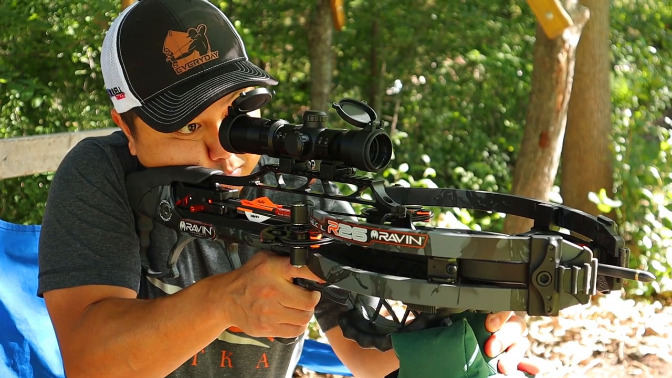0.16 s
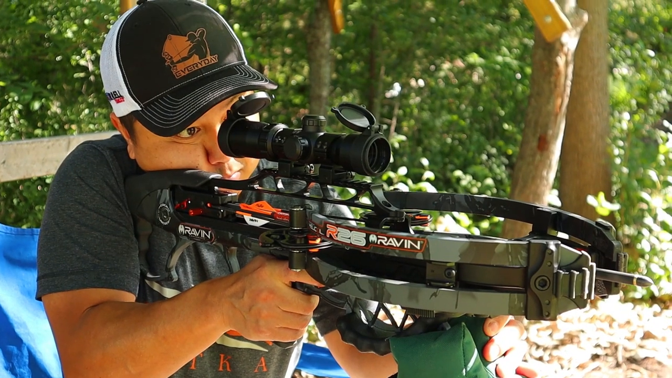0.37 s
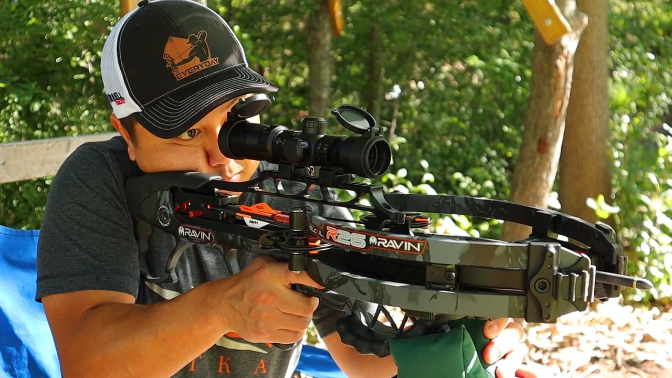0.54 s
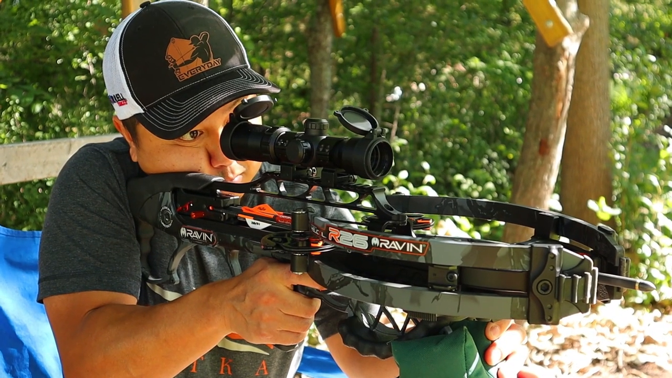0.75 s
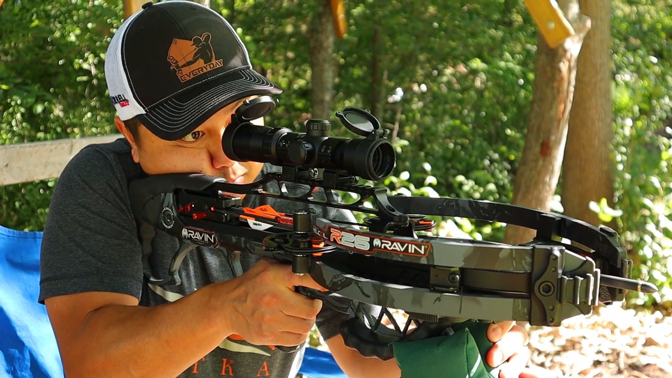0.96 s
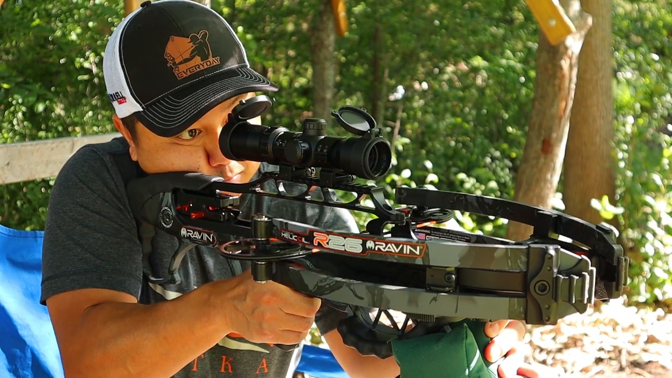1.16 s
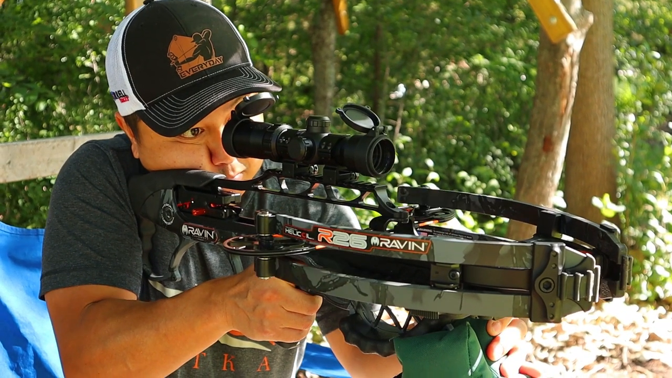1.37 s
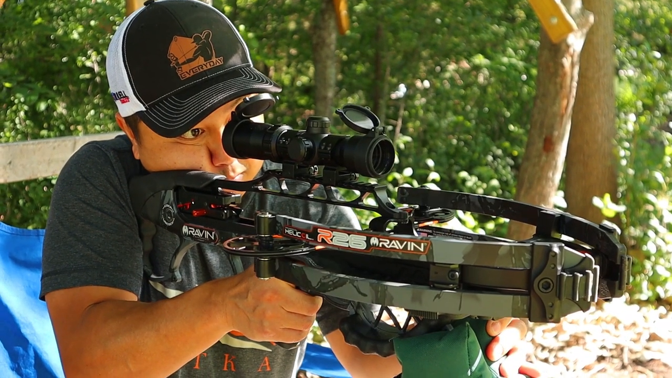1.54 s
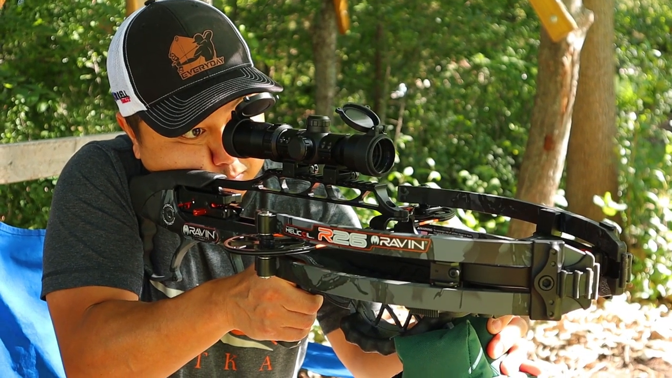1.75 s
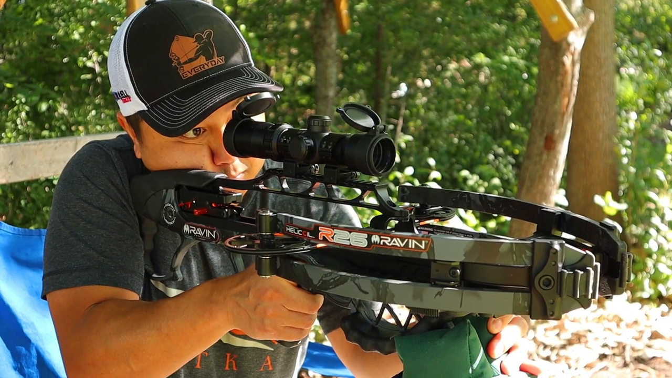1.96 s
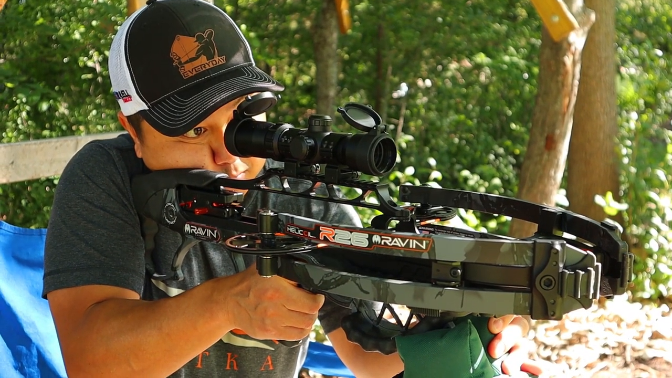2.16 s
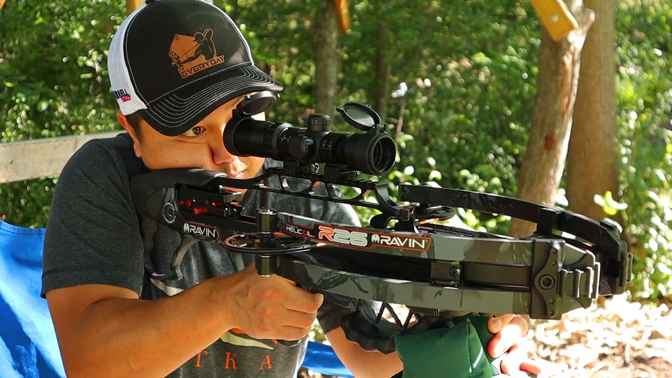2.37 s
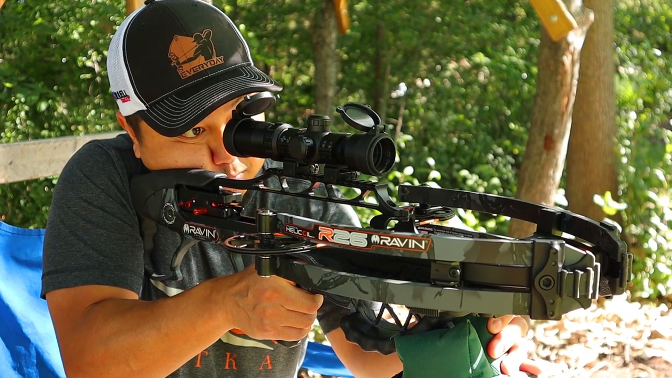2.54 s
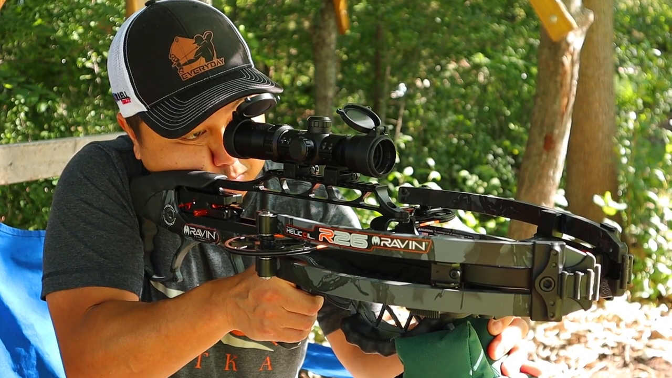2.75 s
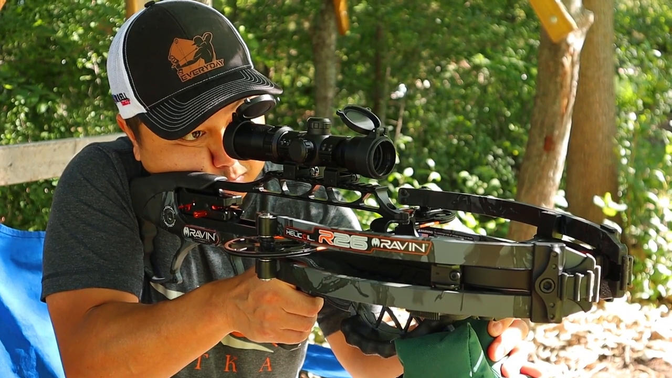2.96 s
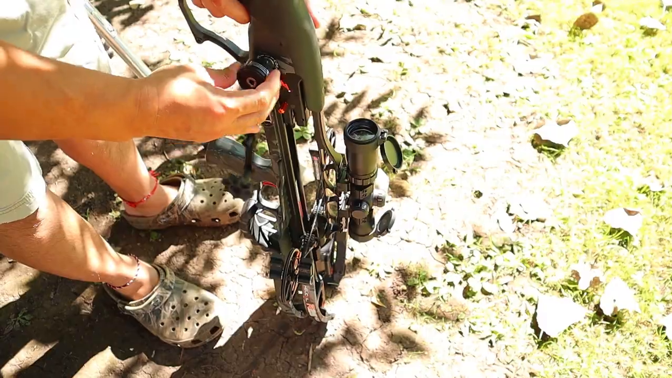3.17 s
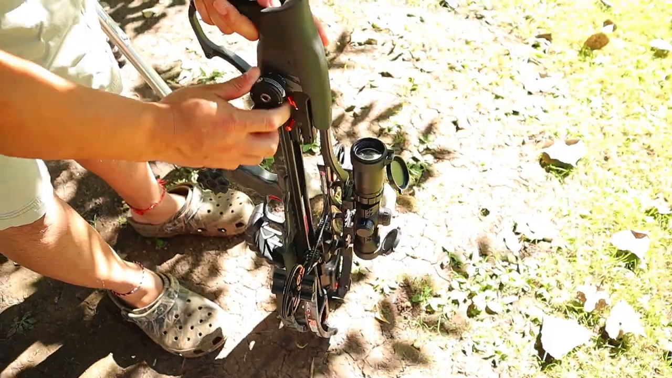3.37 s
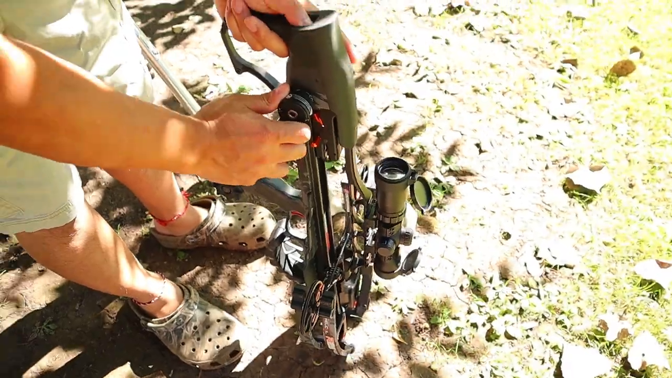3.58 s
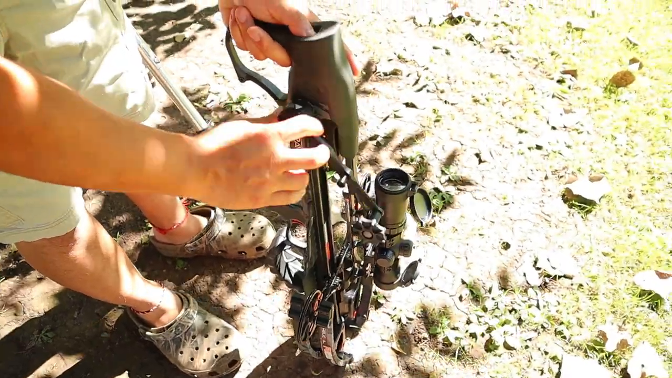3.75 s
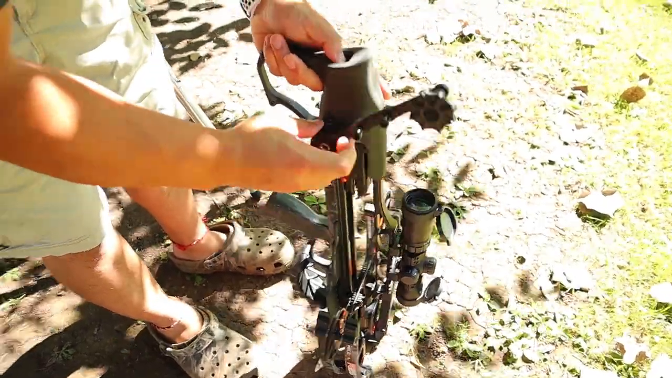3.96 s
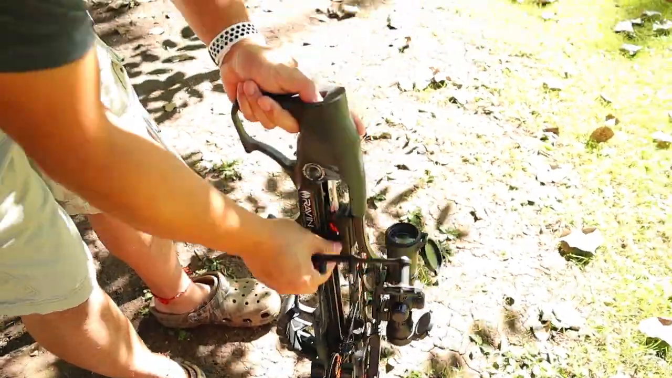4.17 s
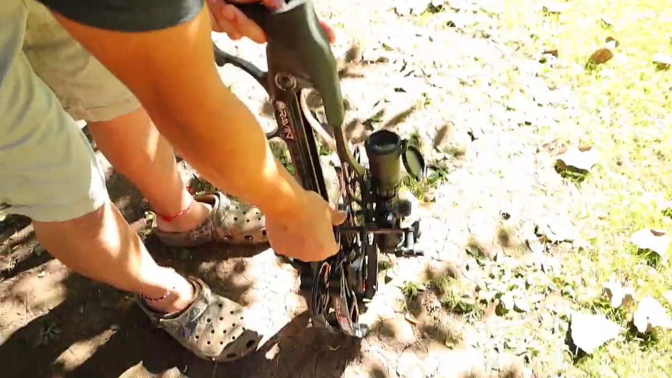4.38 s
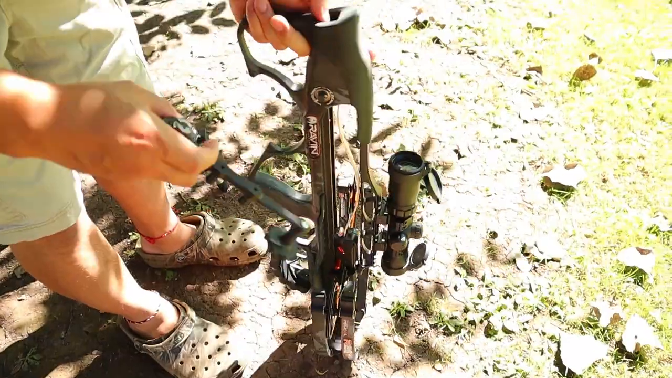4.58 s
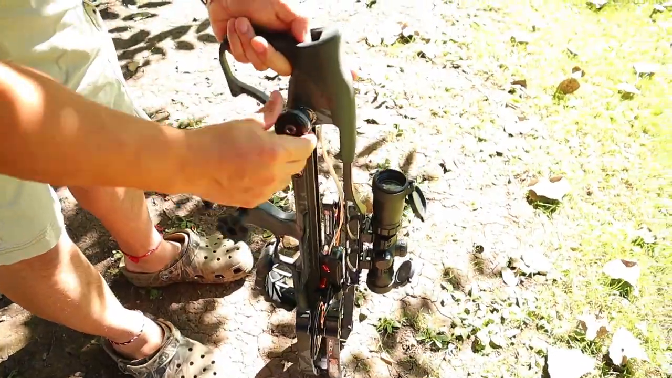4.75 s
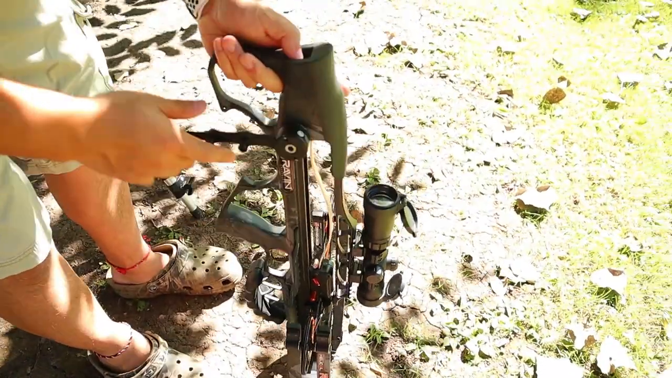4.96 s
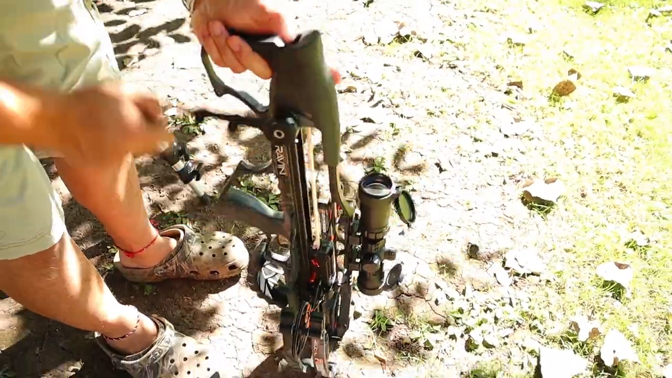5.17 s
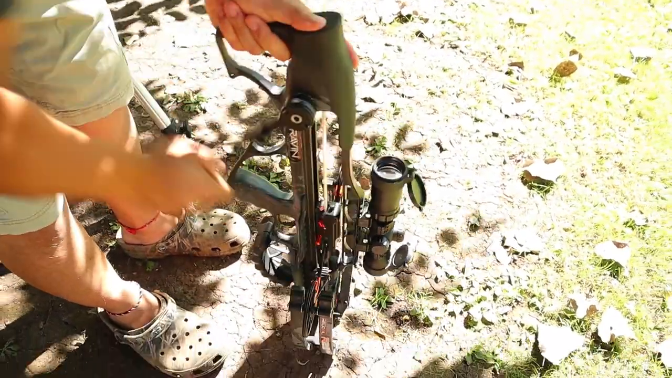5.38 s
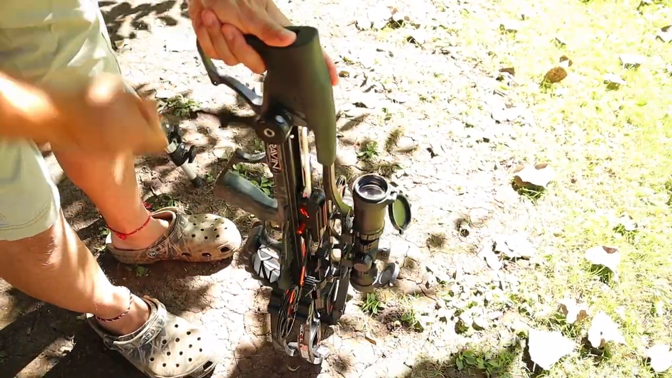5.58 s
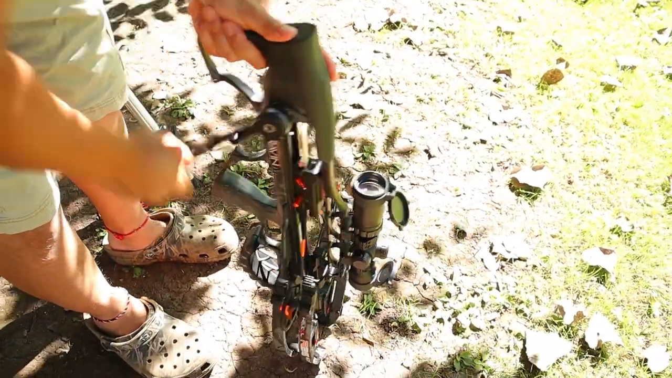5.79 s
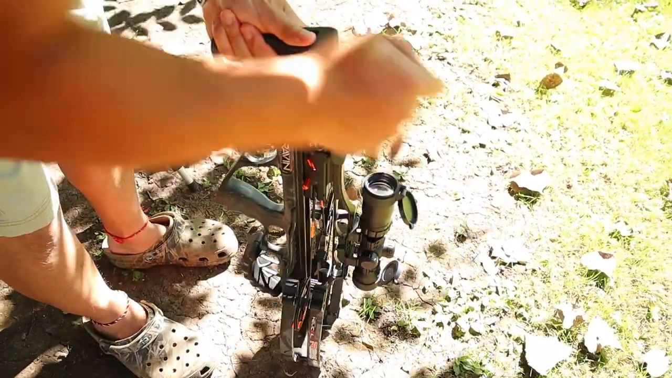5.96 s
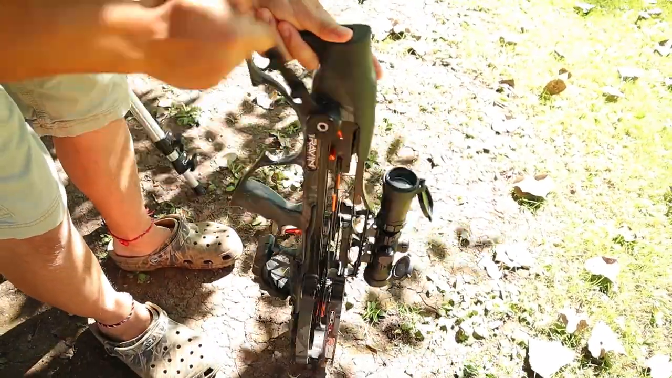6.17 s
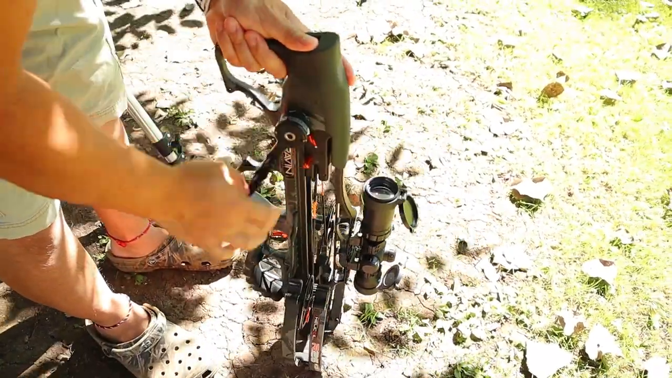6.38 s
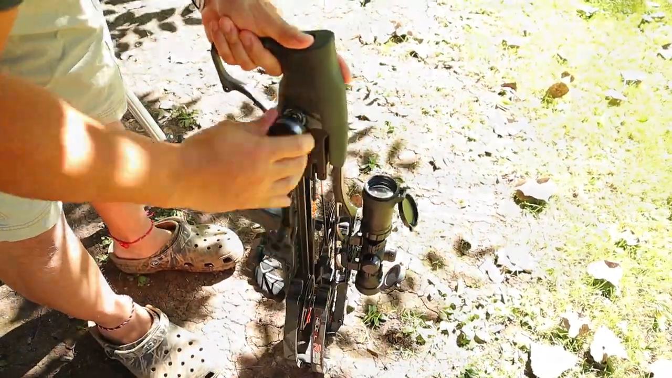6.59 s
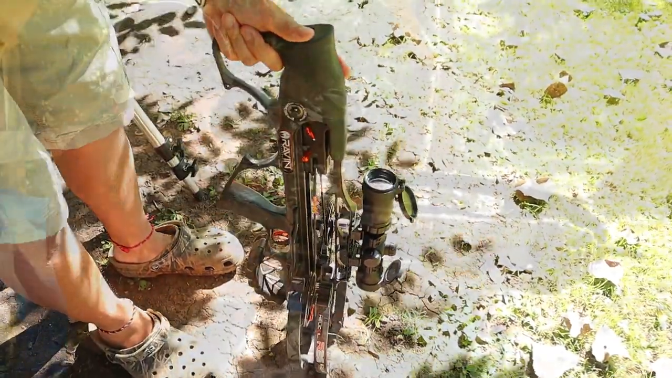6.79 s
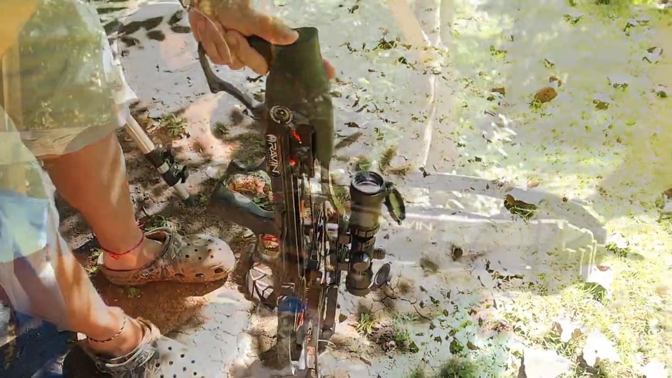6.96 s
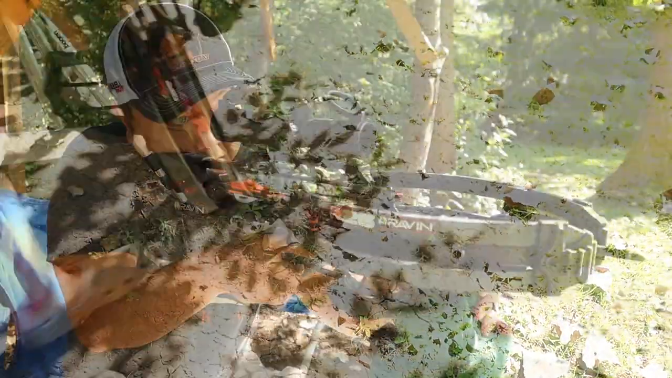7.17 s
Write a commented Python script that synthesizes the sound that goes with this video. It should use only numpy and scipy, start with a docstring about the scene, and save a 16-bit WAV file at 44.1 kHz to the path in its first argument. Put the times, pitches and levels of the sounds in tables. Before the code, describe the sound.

Outdoors, soft woodland noise and an approaching vehicle precede a loud, sharp crossbow snap with a brief limb ring. A fifth of a second later the bolt cracks into a target, and echoes fade through the trees under passing tyres. The place then cuts to a yard with faint hum and hiss, where a crank handle clicks, scrapes and knocks, then spins a bright fast ratchet. Close microphone.

```python
"""A crossbow fires among trees near a road: noise bursts for the string, decaying sines for the limbs,
a pressure swing and crack on the target, tilted noise tails for the echoes. The scene changes to the ground
near a humming machine: a crank handle is fitted with clicks, scrapes and knocks, then spun, and two pawls
rattle over a sixteen-tooth ratchet wheel that binds once a turn: short blows through steel, handle and
stock resonances. Late on, two whistles of a far bird."""
import sys
import numpy as np
from scipy import signal
from scipy.fft import rfft, irfft, next_fast_len
from scipy.io import wavfile
from scipy.ndimage import uniform_filter1d, map_coordinates

SR = 44100
rng = np.random.default_rng(int(sys.argv[2]) if len(sys.argv) > 2 else 0)


def ratio(d):
    """dB to gain"""
    e = np.asarray(d, float) / 20
    return 10 ** e


def store_pcm(level_fs):
    """Save levels as 16-bit WAV."""
    pcm = np.round(np.clip(level_fs, -1, 1) * 32767).astype(np.int16)
    wavfile.write(sys.argv[1], SR, np.atleast_2d(pcm).T)


N = 318843
T = np.arange(N) / SR
CUT_S = 3.193  # trees before, ground after

# colour of bolt crack and echoes: freq_hz, density_db_per_hz (relative)
WOODS = [(90, -42.5), (200, -2), (500, 2.5), (1000, 5), (1900, 1), (3000, 4.5), (4500, -2), (8000, -19.5),
         (12000, -26), (16000, -40.5)]
# steel ring: freq_hz, width_hz, first_pawl_db, second_pawl_db
STEEL = [(5090, 1230, -14.5, -21.5), (6730, 830, -3.5, -1.5), (8510, 680, 1.5, 2), (9350, 810, 0.5, -2.5),
         (11600, 1100, -9, -8), (14500, 2000, -13.5, -9)]
# stock resonances: freq_hz, width_hz, level_db
STOCK = [(1488, 570, -12.5), (1915, 430, -5), (2700, 250, 0.5), (3255, 390, 2), (4330, 740, 2)]


def unit(x):
    """Scale to rms 1."""
    return x / np.sqrt(np.mean(x ** 2) + 1e-20)


def along(points, hz):
    """Read (Hz, value) points on a log frequency axis."""
    f, v = np.transpose(points)
    return np.interp(np.log(hz + 1), np.log(f + 1), v)


def curves(rows):
    """A gate for the span of the rows, then one value per sample for each column."""
    s, *cols = np.transpose(rows)
    gate = np.interp(T, [s[0] - .002, s[0], s[-1], s[-1] + 0.0037], [0, 1, 1, 0])
    return [gate] + [np.interp(T, s, c) for c in cols]


def wobble(rate):
    """A smooth random curve, rate knots a second."""
    knots = rng.standard_normal(int(N * rate / SR) + 4)
    return map_coordinates(knots, [T * rate])


def filtered(x, response):
    """x times a complex response of frequency."""
    m = next_fast_len(N + 8192)
    return irfft(rfft(x, m) * response(np.fft.rfftfreq(m, 1 / SR)), m)[..., :N]


def noise(spectrum):
    """Coloured noise of rms 1."""
    return unit(filtered(rng.standard_normal(N), lambda hz: ratio(along(spectrum, hz))))


def ringing(hz, centre, width):
    """One causal resonance, unit gain at its centre."""
    return 1j * hz * width / (centre ** 2 - hz ** 2 + 1j * hz * width)


def body(x, modes):
    """x through (Hz, width Hz, dB) resonances of alternating sign, unit gain for noise."""
    def response(hz):
        ring = sum((-1) ** k * ratio(db) * ringing(hz, c, w) for k, (c, w, db) in enumerate(modes))
        return unit(np.abs(ring)) * np.exp(1j * np.angle(ring))
    return filtered(x, response)


def fading(s, t60_s, rise_s):
    """An envelope that rises at s and dies away exponentially."""
    t = np.maximum(T - s, 0)
    return ratio(-60 * t / t60_s) * (1 - np.exp(-t / rise_s))


def strikes(times_s, energy_db, t60_s, spike, bend, rebound_s):
    """Excitation of many contacts: a sharp blow, its rebound and a dying rattle, each new."""
    t = np.arange(1024) / SR
    chance = rng.standard_normal((len(times_s), len(t)))
    rows = ratio(-60 * (t / np.reshape(t60_s, (-1, 1))) ** bend) * chance  # bend over 1 holds, then drops
    rows = rows * (1 + 1.5 * np.exp(-((t - rebound_s) / 0.00014) ** 2)) + spike * (t == 0)
    rows = rows * ratio(energy_db)[:, None] / np.linalg.norm(rows, axis=1, keepdims=True)
    at = np.round(np.asarray(times_s) * SR).astype(int)[:, None] + np.arange(len(t))
    return np.bincount(at.ravel(), rows.ravel(), N + len(t))[:N]


def road():
    """A vehicle nears and passes: tyre hiss, a narrow-band engine drone, and rumble that follows it."""
    # time_s, tyre_hiss_db, engine_db, engine_drone_hz
    passing = [(0, -52, -63, 199.8), (1.1, -50.5, -65, 228.3), (1.5, -51.5, -58.5, 283.7),
               (1.95, -43.5, -48, 273.5), (2.55, -43, -41.5, 240.3), (2.85, -43, -44.5, 243),
               (3.19, -44, -39, 223.6)]
    # freq_hz, density_db_per_hz (relative)
    tyre_colour = [(210, -13), (350, -3.5), (459, -4.5), (579, -6.5), (1080, 1), (1290, 0), (2690, -12),
                   (3380, -15.5), (4880, -28.5), (9000, -55.5), (11700, -79), (19800, -120)]
    rumble_colour = [(25, -26.5), (60, -1.0), (110, 1), (180, -3.5), (350, -26.0), (700, -60)]
    _, hiss_db, drone_db, drone_hz = curves(passing)
    rumble_db = -49.5 + .55 * (drone_db + 43)  # swings .55 dB per engine dB
    phase = 2 * np.pi * np.cumsum(drone_hz) / SR
    drone = (wobble(120) + 1j * wobble(120)) * np.exp(1j * phase)  # a narrow band of noise
    tyres = ratio(hiss_db + 0.48 * wobble(6)) * noise(tyre_colour)
    engine = ratio(drone_db + 1.9 * wobble(8)) * unit(drone.real)
    return tyres + engine + ratio(rumble_db + 1.8 * wobble(8.1)) * noise(rumble_colour)


def trees():
    """Steady coloured noise of the woods."""
    # freq_hz, density_db_per_hz (relative)
    colour = [(12, -34.5), (20, -11), (134, -2), (270, -11), (357, -26.5), (485, -14), (1290, -8.5),
              (2990, -18), (4300, -26.5), (12100, -42), (16000, -46.5)]
    return ratio(-48) * noise(colour)


def shot():
    """String release, stop and rebound as noise bursts; the limbs and rail as decaying sines."""
    # release, stop, rebound: start_s, level_db, t60_s
    snap = [(1.1577, 3, 0.056), (1.1641, 7.5, 0.028), (1.171, -1, 0.09)]
    # freq_hz, density_db_per_hz (relative)
    string_colour = [(71, -47.5), (120, -23.5), (378, -7.5), (1830, -6), (2110, -4.5), (2480, 0.5),
                     (5300, -14.5), (7050, -18.5), (7660, -23), (10400, -19.5), (16000, -28)]
    # limb and rail modes: freq_hz, level_db, t60_s
    limbs = [(140, -18, 0.081), (432, -4, 0.18), (446, -11.5, 0.3), (697, -7.5, 0.12), (973, -6, 0.05),
             (1245, -2.5, 0.054), (1400, -15.5, 0.068), (1980, -10.5, .07), (2478, 2, 0.034),
             (2560, -7.5, 0.067), (3250, -4, 0.069), (4030, -7, 0.037)]
    flutter_db, build_cycles = 2.5, 1.5  # unsteady ring; swings a mode takes to build up
    out = sum(ratio(db) * fading(s, t60, 0.0002) for s, db, t60 in snap) * noise(string_colour)
    start = snap[0][0]
    for hz, db, t60 in limbs:
        level = ratio(db + flutter_db * wobble(45)) * fading(start, t60, build_cycles / hz)
        out = out + level * np.sin(2 * np.pi * hz * (T - start))
    return out


def echoes():
    """Trunks scatter each bang back; farther trunks return it later, weaker and duller."""
    # after the string, after the bolt: start_s, level_db, first_tilt_db_per_octave
    bangs = [(1.18, -21.5, 3), (1.372, -24, 1.5)]
    near_t60_s, far_t60_s, far_db, build_s = .45, 1.8, -19, .004  # far_db: relative to near trunks
    dulling, dullest = 12, -9.5  # tilt lost, dB per octave a second; lowest tilt, dB per octave
    out = 0
    for s, db, tilt in bangs:
        hz, t, z = signal.stft(noise(WOODS), SR, nperseg=256)
        octaves = np.log2(np.maximum(hz, 150) / 2800)[:, None]
        tilt_now = np.clip(tilt - dulling * (t - s), dullest, tilt)
        tail = signal.istft(z * ratio(octaves * tilt_now), SR, nperseg=256)[1][:N]
        dying = fading(s, near_t60_s, build_s) + ratio(far_db) * fading(s, far_t60_s, build_s)
        out = out + ratio(db + 0.89 * wobble(70)) * dying * tail
    return out * (T < CUT_S)


def target():
    """Bolt strike and its slap off a wall: a pressure swing, a short crack, the block's dull ring."""
    # strike, slap: start_s, level_db, swing_hz, crack_db (relative to the swing)
    hits = [(1.3692, -12.5, 1496, 3.5), (1.3906, -6.5, 795, -7.5)]
    block_db, block_hz, block_t60_s = -24.5, 410, 0.063
    out = 0
    for s, db, hz, crack_db in hits:
        u = (T - s) * hz  # cycles since the hit
        swing = np.sin(2 * np.pi * u) * np.exp(-(np.maximum(u - .6, 0) / 0.3) ** 2) * (u > 0)
        crack = ratio(crack_db) * fading(s, 0.013, .0001) * noise(WOODS)
        ring = fading(s, block_t60_s, 0.0022) * np.sin(2 * np.pi * block_hz * (T - s) + wobble(60))
        out = out + ratio(db) * (swing + crack) + ratio(block_db) * ring
    return out


def yard():
    """Yard hiss and low wind noise on the microphone, each of wavering level."""
    # time_s, wind_db, hiss_db
    air = [(3.2, -59, -54.5), (3.8, -62.5, -55.5), (4.1, -51.5, -53), (4.5, -50, -55), (5.4, -66, -53.5),
           (6.75, -66.5, -56), (7.0, -58.5, -51), (7.23, -53, -54.5)]
    # freq_hz, density_db_per_hz (relative)
    hiss_colour = [(12, -34), (20, -9), (60, 1), (142, -8), (216, -3.5), (293, -5.5), (367, -3.5),
                   (459, -10), (542, -4), (607, -8.5), (1030, -10.5), (2140, -12.5), (5080, -16),
                   (14700, -20), (16000, -25.5)]
    wind_colour = [(15, -26), (40, 0.5), (80, -1), (140, -10), (300, -48)]
    _, wind_db, hiss_db = curves(air)
    wind = ratio(wind_db + 2.6 * wobble(9)) * noise(wind_colour)
    return ratio(hiss_db + 1.5 * wobble(11)) * noise(hiss_colour) + wind


def hum():
    """Machine hum: partials of one wavering pitch, unsteady in level and phase."""
    # time_s, pitch_hz, level_db
    pitch = [(3.2, 556, -60.5), (3.7, 546, -58.5), (5.0, 538, -59), (5.3, 546, -59), (6.0, 537, -59),
             (6.4, 545, -59), (6.8, 518, -59), (7.23, 541, -59)]
    # pitch_multiple, level_db (relative)
    partials = [(.4, -7.5), (.675, -3), (.81, -10.5), (1, -0.5), (1.2, -7), (1.365, -6)]
    _, hz, level_db = curves(pitch)
    turns = np.cumsum(hz * (1 + 0.004 * wobble(4))) / SR
    out = 0
    for k, db in partials:
        tone = np.sin(2 * np.pi * k * turns + 1.1 * wobble(7.8))
        out = out + ratio(level_db + db + 1.8 * wobble(6)) * tone
    return out


def fizz():
    """A thin hiss, perhaps far leaves or insects: a band of noise."""
    # time_s, level_db
    level = [(3.2, -59.5), (4.0, -61), (4.6, -67), (7.23, -66.5)]
    # freq_hz, density_db_per_hz (relative)
    colour = [(2000, -29), (3500, -3), (5200, 0.5), (6300, -5.5), (8000, -25)]
    return ratio(curves(level)[1] + wobble(9.2)) * noise(colour)


def handling():
    """Clicks, random ticks of loose parts and sliding scrapes excite the steel parts and stock."""
    # clear small contacts: start_s, steel_energy_db, stock_energy_db, t60_s
    clicks = [(3.219, -14.5, -32.5, .012), (3.2562, -19.5, -38, .005), (3.3483, -20, -38, .023),
              (3.392, -13.5, -22, .012), (3.4095, -16, -17, 0.024), (3.711, -2, -7, 0.0064),
              (3.8134, -36, -24.5, .015), (3.9329, -27, -24.5, .011), (3.966, -24.5, -19, 0.033),
              (3.9795, -21.5, -26, .019), (4.0187, -14, -25, 0.0053), (4.0237, -21, -22, 0.026),
              (4.0821, -8, -22.5, 0.025), (4.101, -22, -21.5, .012), (4.2012, -20, -24, .013),
              (4.2219, -18, -17.5, .01), (4.286, -14.5, -22, .024), (4.3267, -16.5, -23, .023),
              (4.3035, -19.5, -25, .015), (4.3615, -20, -14.5, .015), (4.3692, -16, -39, 0.017),
              (4.3768, -9.5, -19, .019), (4.3849, -2.5, -8, 0.0066), (4.4889, -27.5, -20, 0.012),
              (4.5144, 4.5, 2.5, 0.016), (4.548, -39, -23, .02), (4.5869, -20, -40, .0058),
              (4.5922, -22, -28, .009), (4.93, -12.5, -29, .0058), (4.9597, -15, -21, 0.0072),
              (4.9654, -10, -18, 0.018), (4.9788, -10, -29, .0078), (5.0117, -18, -29, .008),
              (5.0223, -8, -23, .007), (6.2495, -7, -22, 0.0041), (6.3804, -37, -26, .011),
              (6.4206, -18, -32, .009), (6.5541, -26, -32.5, 0.0077), (6.6457, -21.5, -36.5, .019),
              (6.684, 0, -19, .015), (7.1444, -24, -31, .024), (7.205, -28, -35, .023)]
    # loose parts tick as the hands fumble: start_s, end_s, ticks_per_s, steel_energy_db, stock_energy_db
    fumbles = [(3.262, 3.335, 55, -26, -43.5), (3.413, 3.447, 74, -29, -35), (3.983, 4.045, 44, -23, -30),
               (4.18, 4.2, 90, -30, -48), (4.234, 4.37, 41, -23.5, -25), (4.401, 4.43, 60, -37, -32),
               (6.4, 6.48, 25, -28, -39)]
    # metal on metal: start_s, end_s, steel_start_db, steel_end_db, stock_db
    scrapes = [(3.352, 3.369, -43, -42, -42), (3.578, 3.625, -58, -59, -73),
               (4.223, 4.389, -51, -38.5, -51), (4.944, 4.961, -48, -37, -51),
               (6.933, 6.961, -50, -55, -60), (7.111, 7.162, -62, -55.5, -66.5)]
    scatter_db, usual_t60_s = 3.5, 0.008  # of the ticks
    ticks = []
    for start, end, rate, steel, stock in fumbles:
        for k in range(round(rate * (end - start))):
            s = start + (k + rng.random()) / rate
            a, b, c = rng.standard_normal(3)
            ticks.append((s, steel + scatter_db * a, stock + scatter_db * b, usual_t60_s * np.exp(0.44 * c)))
    s, steel_db, stock_db, t60 = np.transpose(clicks + ticks)
    t60 = np.clip(t60, .003, .05)
    bright = strikes(s, steel_db, t60, spike=6.0, bend=1.3, rebound_s=0.0017)
    dull = strikes(s, stock_db, t60, spike=2.9, bend=1.16, rebound_s=0.0039)
    # slips of uneven size
    grit = [unit(ratio(4.1 * wobble(600)) * rng.standard_normal(N)) for _ in range(2)]
    for start, end, first_db, last_db, stock_db in scrapes:
        gate, steel_db = curves([(start, first_db), (end, last_db)])
        bright = bright + gate * ratio(steel_db) * grit[0]
        dull = dull + gate * ratio(stock_db) * grit[1]
    # held parts ring damped
    broad = [(hz, 2.1 * width, db + 5 * (hz > 10000)) for hz, width, db, _ in STEEL]
    return body(bright, broad) + body(dull, STOCK)


def knocks():
    """Taps and thumps ring for a few swings; the stock's thud starts with a jolt that flips."""
    # hard taps on the hollow stock: start_s, level_db
    taps = [(3.966, -34.5), (4.766, -36), (4.775, -30.5), (4.886, -42), (4.895, -29.5)]
    # hollow stock modes: freq_hz, level_db (relative), t60_s
    hollow = [(584, -5, 0.015), (935, -0.5, 0.02), (1195, -2.5, 0.013)]
    # dull thumps through the ground: start_s, level_db, freq_hz
    thumps = [(3.971, -32, 187), (4.469, -36, 105), (5.162, -32, 98), (5.777, -32, 226), (5.79, -32, 302),
              (5.864, -26.5, 202), (5.881, -33, 200), (5.981, -29, 203), (6.016, -40, 180),
              (6.723, -39, 170), (6.74, -32, 212), (6.758, -33, 150), (6.901, -30.5, 220),
              (7.152, -34, 130)]
    thump_t60_cycles = 5.2
    # the stock drops on hard ground
    thud_s, thud_db, thud_hz, thud_t60_s, flip_delay_s = 4.7738, -23.5, 76, .085, .0011
    rings = [(s, db + level + rng.normal(0, 1.6), hz, t60) for s, db in taps for hz, level, t60 in hollow]
    rings += [(s, db, hz, thump_t60_cycles / hz) for s, db, hz in thumps]
    out = 0
    for s, db, hz, t60 in rings:
        out = out + ratio(db) * fading(s, t60, 0.0003) * np.sin(2 * np.pi * hz * (T - s))
    flip_s = thud_s + flip_delay_s
    swing = fading(flip_s, thud_t60_s, 0.000052) * np.cos(2 * np.pi * thud_hz * (T - flip_s) - .8)
    jolt = swing - 4.1 * fading(thud_s, 0.03, 0.0018) * (T < flip_s)
    return out + ratio(thud_db) * filtered(jolt, lambda hz: 1 / (1 + 1j * hz / 2600) ** 2)


def ratchet():
    """Each tooth drops the first pawl, then the second; the wheel's dwell pattern repeats every turn."""
    # time_s, teeth_turned
    crank = [(5.0755, 0), (5.0987, 1), (5.1133, 2), (5.142, 4), (5.1833, 8), (5.2055, 10), (5.2337, 12),
             (5.2764, 16), (5.3027, 19), (5.3643, 27), (5.4667, 43), (5.5639, 59), (5.6647, 75),
             (5.7705, 91), (5.8798, 107), (5.9899, 123), (6.1063, 139), (6.232, 157)]
    # time_s, click_db, handle_ring_db (relative), stock_db (relative)
    effort = [(5.07, -34, -37, -14), (5.25, -32, -19, -13.5), (5.29, -27, -10, -16),
              (5.465, -28.5, -8, -18), (5.52, -27, -21, -20), (6.0, -25, -23, -23.5), (6.14, -25, -23, -21),
              (6.232, -27, -13, -19.5)]
    # crank handle's low and high ring: freq_hz, width_hz, level_db
    handle = [(4150, 260, 0), (4520, 300, 0)]
    wheel_teeth = 16
    bind_tooth, bind_teeth, bind_dwell = 3.7, 1.5, .5  # tight spot: place, width, extra dwell share
    bind_db = 2  # added to the second pawl at the tight spot
    uneven_db, lag_teeth = .7, .41  # scatter from tooth to tooth; second pawl's lag
    swell_tooth, swell_db = 10.5, 2.1  # both pawls drop hardest where the wheel runs free
    glide_s = (5.3, 5.47)  # handle ring moves from low to high
    s, teeth = np.transpose(crank)
    teeth = teeth.astype(int)
    tooth = np.arange(teeth[-1] + 1) % wheel_teeth
    bind = np.exp(-((tooth - bind_tooth) / bind_teeth) ** 2)
    dwell = 1 + bind_dwell * bind
    pawl_db = uneven_db * rng.standard_normal((2, wheel_teeth))[:, tooth] + [0 * bind, bind_db * bind]
    pawl_db = pawl_db + swell_db * np.cos(2 * np.pi * (tooth - swell_tooth) / wheel_teeth)
    angle = np.cumsum(dwell) - dwell
    _, click_db, handle_db, stock_db = curves(effort)
    blows, shakes = [], 0
    for pawl, late in enumerate([0, lag_teeth + 0.052 * bind]):
        times = np.interp(angle + late * dwell, angle[teeth], s)[:len(angle) - pawl]
        at = (times * SR).astype(int)
        share_db = 10 * np.log10(np.gradient(times) * SR / 2)  # each blow carries its own interval's power
        mean_db = click_db[at] + share_db
        energy_db = mean_db + pawl_db[pawl][:len(at)] + 0.43 * rng.standard_normal(len(at))
        blows.append(strikes(times, energy_db, 0.0053, spike=6.1, bend=1.2, rebound_s=0.0013))
        shakes = shakes + strikes(times, mean_db, 0.02, spike=0.37, bend=1.1, rebound_s=0.00087)
    high = np.interp(T, glide_s, [0, np.pi / 2])  # equal-power crossfade
    shakes = shakes * ratio(handle_db)
    out = body(shakes * np.cos(high), handle[:1]) + body(shakes * np.sin(high), handle[1:])
    out = out + body(sum(blows) * ratio(stock_db), STOCK[1:])
    for k, (hz, width, first_db, second_db) in enumerate(STEEL):
        drive = ratio(first_db) * blows[0] + ratio(second_db) * blows[1]
        facing = ratio(1.9 * wobble(45))  # turning parts aim each mode at the microphone and away
        out = out + (-1) ** k * filtered(ratio(11.5) * facing * drive, lambda f: ringing(f, hz, width))
    return out


def bird():
    """A far bird's two short whistles, made rough by random phase."""
    # start_s, level_db, pitch_hz, length_s
    chirps = [(7.039, -48, 4650, .028), (7.062, -45.5, 4900, .033)]
    out = 0
    for s, db, hz, length in chirps:
        swell = np.sin(np.pi * np.clip((T - s) / length, 0, 1)) ** 2
        out = out + ratio(db) * swell * np.sin(2 * np.pi * hz * T + 2.4 * wobble(300))
    return out


def scene():
    """All sources at one microphone; small, distant bangs radiate little bass."""
    ambience = np.where(T < CUT_S, road() + trees(), yard() + hum() + fizz())
    bangs = filtered(shot() + target(), lambda hz: (1j * hz / (130 + 1j * hz)) ** 2)
    return (ambience + bangs + echoes() + handling() + knocks() + ratchet() + bird())[None]


def low_pass(x):
    """Removes everything above the highest recorded frequency."""
    return signal.sosfilt(signal.butter(12, 16480, fs=SR, output="sos"), x)


def record(dry):
    """Gain control ducks on the bang and recovers at a steady dB rate; what it misses clips softly."""
    power = np.abs(uniform_filter1d(dry ** 2, 130))
    over_db = 20 * np.log10(np.sqrt(power) + 1e-9) + 12  # above -12 dB
    recover_db = 170 * T  # before the .7 below
    duck_db = np.maximum(np.maximum.accumulate(over_db + recover_db, axis=1) - recover_db, 0)
    late_db = uniform_filter1d(np.pad(duck_db, ((0, 0), (300, 0)))[:, :N], 600)
    x = dry * ratio(-.7 * late_db)
    x = x / (1 + np.abs(x) ** 6) ** (1 / 6)
    x = filtered(x, lambda hz: 1j * hz / (30 + 1j * hz))  # the input blocks the lowest bass
    return low_pass(x)


dry = scene()
out = record(dry)
store_pcm(out)
```